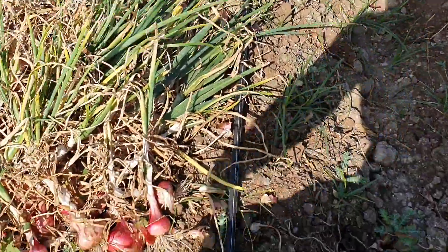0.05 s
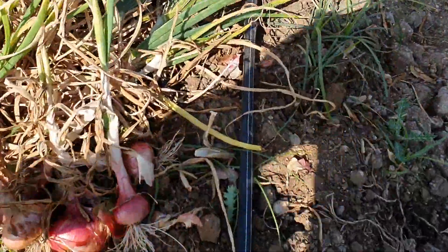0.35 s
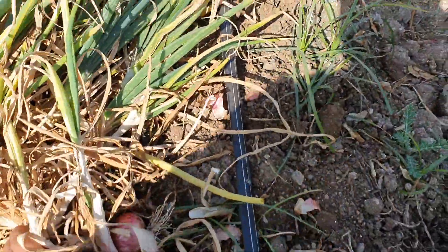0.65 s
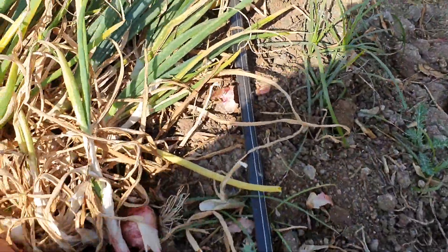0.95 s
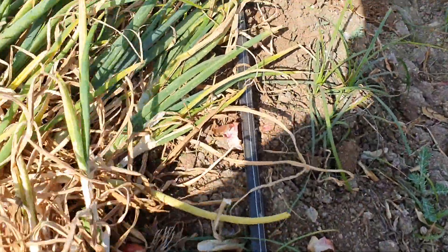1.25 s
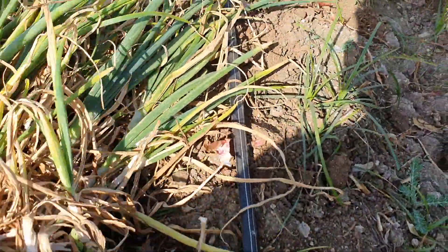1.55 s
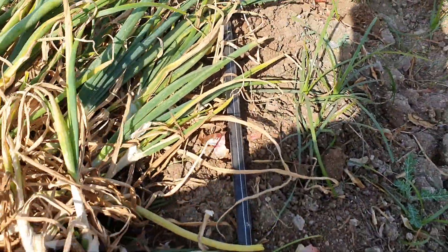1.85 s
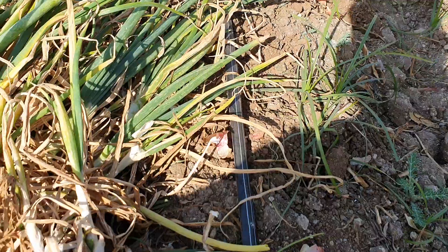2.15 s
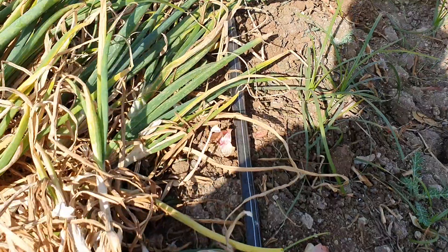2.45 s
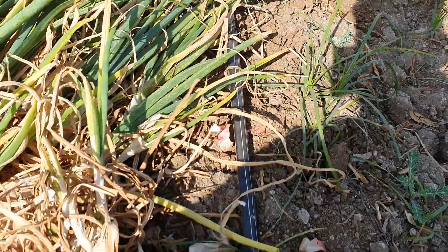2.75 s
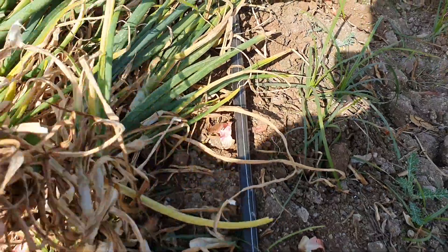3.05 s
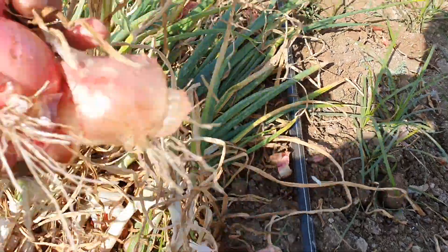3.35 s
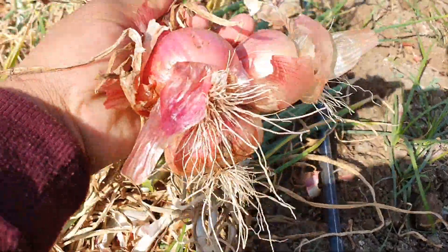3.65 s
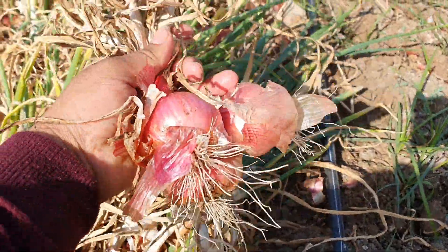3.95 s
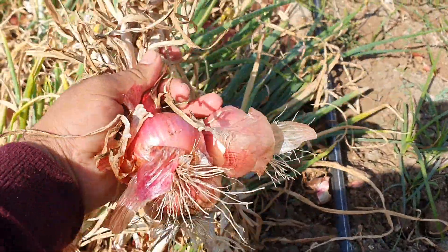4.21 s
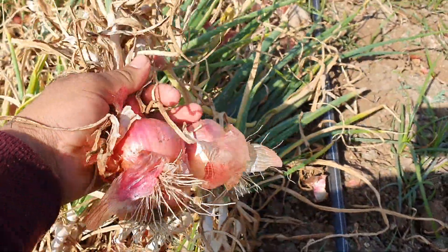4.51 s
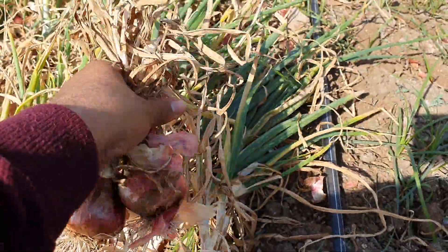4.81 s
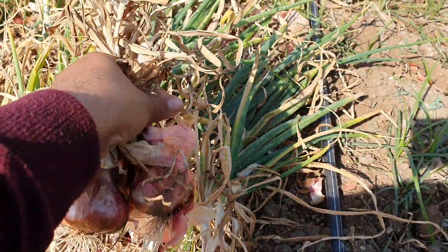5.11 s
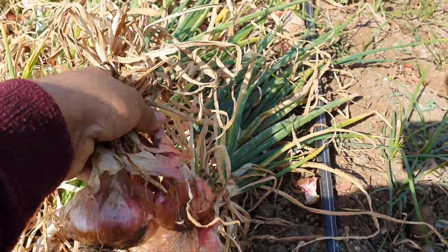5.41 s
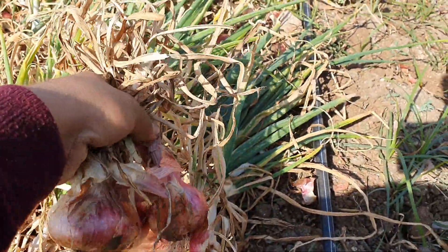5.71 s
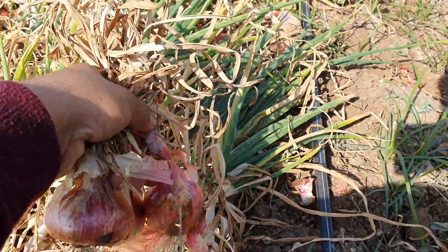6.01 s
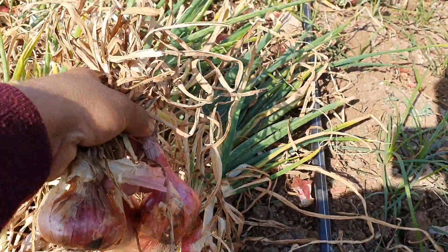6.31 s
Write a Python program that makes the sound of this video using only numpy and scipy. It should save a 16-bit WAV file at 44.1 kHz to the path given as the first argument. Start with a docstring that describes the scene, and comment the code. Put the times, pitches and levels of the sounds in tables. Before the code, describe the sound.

Dry onion tops crackle and snap as onions are pulled from the soil with soft thuds and handled, over a low rumble.

```python
"""Onions are pulled by hand in a dry field, over a low rumble and a faint stir of leaves.
A clod crumbles; then, close on the left, the withered tops crackle and snap as their fibres fracture,
and green stalks rasp by friction. Near 3 s roots tear out of the soil with damped thuds.
From 3.5 s dry leaves rustle off to the right while the bunch is lifted and turned.
A small, distant bird calls once near 5.7 s, and the leaves on the right end with a hard scrape."""
import sys
import numpy as np
from scipy import signal
from scipy.fft import rfft, irfft, next_fast_len
from scipy.io import wavfile
from scipy.ndimage import map_coordinates

SR = 44100
rng = np.random.default_rng(int(sys.argv[2]) if len(sys.argv) > 2 else 0)


def unload_audio(sound):
    """Save the sound as a 16-bit wav file, at the path given as the first command line argument."""
    columns = np.transpose(np.atleast_2d(sound))
    # keep every value between -1 and 1, then stretch to whole-number steps
    steps = np.round(np.clip(columns, -1, 1) * 32767)
    wavfile.write(sys.argv[1], SR, steps.astype(np.int16))


N = 280917
TIME = np.arange(N) / SR


def amp(db):
    """Amplitude ratio of a level in decibels."""
    return 10 ** (np.asarray(db) / 20)


def unit(x):
    """Normalisation to unit rms."""
    return x / np.sqrt(np.mean(x ** 2) + 1e-20)


def balance(db):
    """Level difference between channels: the left gains db, the right loses as much."""
    return amp(db * np.array([[1], [-1]]))


def along(points, hz):
    """Interpolation of a spectrum on a logarithmic frequency axis."""
    f, level = np.transpose(points)
    return np.interp(np.log(hz + 1), np.log(f + 1), level)


def curve(points):
    """Linear interpolation of (time, value) points at every sample."""
    return np.interp(TIME, *np.transpose(points))


def wobble(rate):
    """Slow random modulation: a spline through rate Gaussian knots a second."""
    coarse = TIME[::8]
    knots = rng.standard_normal(int(N * rate / SR) + 4)
    return np.interp(TIME, coarse, map_coordinates(knots, [coarse * rate]))


def coloured(x, gain):
    """Minimum-phase filtering: folding the cepstrum gives a causal response of magnitude gain(f)."""
    m = 2 * next_fast_len(N // 2 + 4096)
    magnitude = np.maximum(gain(np.fft.rfftfreq(m, 1 / SR)), 1e-6)
    cepstrum = irfft(np.log(magnitude), m)
    cepstrum[1:m // 2] *= 2
    cepstrum[m // 2 + 1:] = 0
    return irfft(rfft(x, m) * np.exp(rfft(cepstrum)), m)[..., :N]


def scattered(x, wet_db, t60):
    """Diffuse scattering: soil and leaves add a tail to short waves, new on each side every 10 ms."""
    block = SR // 100
    t = np.arange(3 * block) / SR
    short_waves = signal.sosfilt(signal.butter(2, 650, "highpass", fs=SR, output="sos"), x)
    pieces = np.pad(short_waves, ((0, 0), (0, -N % block))).reshape(2, -1, block)
    tails = rng.standard_normal((2, pieces.shape[1], len(t)))
    tails *= amp(-60 * t / t60) * (1 - np.exp(-t / 0.00064))
    tails /= np.linalg.norm(tails, axis=-1, keepdims=True)
    echoes = signal.fftconvolve(pieces, tails, axes=2)
    at = block * np.arange(pieces.shape[1])[:, None] + np.arange(echoes.shape[2])
    return x + amp(wet_db) * np.array([np.bincount(at.ravel(), side.ravel())[:N] for side in echoes])


def fractures(lead_ms, per_second, size_db, spread_ms, clump_db):
    """Brittle fracture: fibres emit random impulses, reaching the left about lead_ms before the right."""
    polarity, strength, spot = rng.standard_normal((int(per_second * N / SR), 3)).T
    at = rng.integers(0, N, len(spot))
    clumps = wobble(45) + wobble(220)
    size = np.sign(polarity) * amp(size_db * np.minimum(strength, 2.5) + clump_db * clumps[at])
    half_lead = (lead_ms[at] + spread_ms * spot) * SR / 2000
    arrivals = np.round(4 * np.array([at - half_lead, at + half_lead]))  # in quarter samples
    fine = [np.bincount(side, size, 4 * N) for side in np.clip(arrivals, 0, 4 * N - 1).astype(int)]
    return unit(signal.resample_poly(np.array(fine), 1, 4, axis=1))


def rustle(clicks, colour_db, levels, flutter_db):
    """Source and filter: impulses excite three bands, each shaped by colour_db and set to its level."""
    bands_hz = [(1900, 7500), (7500, 20000), (150, 1900)]  # blade crackle, thin-skin fizz, stalk body
    out = np.zeros((2, N))
    for (lo, hi), db in zip(bands_hz, levels):
        def gain(hz):
            return amp(colour_db(hz)) / np.sqrt((1 + (lo / (hz + 1)) ** 12) * (1 + (hz / hi) ** 12))
        out += amp(db) * unit(coloured(clicks, gain) * amp(flutter_db * wobble(300)))
    return out


def burst(hz, width, t60):
    """Resonance driven by decaying noise, at unit peak; width is the fractional bandwidth."""
    t = np.arange(SR // 5) / SR
    kick = rng.standard_normal(len(t)) * amp(-60 * t / t60)
    b, a = signal.iirpeak(min(hz, SR / 2.5), max(1 / width, hz / 9000), SR)
    ring = signal.lfilter(b, a, kick)
    return ring / np.abs(ring).max()


def stroke(start, length, attack_s=0.093, release_db_per_s=146):
    """Envelope of one movement: a quarter-sine rise, and exponential decay once its length is over."""
    t = TIME - start
    rise = np.sin(np.pi / 2 * np.clip(t / attack_s, 0, 1))
    return rise * amp(-release_db_per_s * np.clip(t - length, 0, 1))


def effort(strokes):
    """Incoherent addition: the powers of strokes sum to crackle, fizz and body levels in dB."""
    power = np.full((3, N), 1e-12)
    for start, length, db, fizz_db, body_db in strokes:
        power += (amp([[db], [db + fizz_db], [db + body_db]]) * stroke(start, length)) ** 2
    return 10 * np.log10(power)


# Spectrum of the rumble: f/Hz, relative density/dB
RUMBLE_SPECTRUM = [(12, -27), (20, -18), (40, -2), (60, 5), (98, -1), (139, -9.5), (387, -24), (500, -39),
                   (650, -45), (1100, -120)]
# Envelope of the rumble: t/s, level/dB
RUMBLE_ENVELOPE = [(0, -54), (.09, -62), (.24, -48.5), (.39, -62.5), (.5, -55), (2.5, -53.5), (5.2, -55),
                   (6.37, -55.5)]
# Soft bumps in the rumble: t/s, envelope peak/dB
BUMPS = [(.21, -39.5), (.475, -45), (.94, -45), (1.23, -43), (1.605, -44), (1.91, -48), (2.811, -40),
         (4.131, -45), (4.32, -45), (4.48, -45), (4.63, -46), (4.861, -43), (5.77, -46.5), (5.92, -45),
         (6.26, -45.5)]
def rumble(bump_s=0.014, bump_hz=68):
    """Low-frequency noise, nearly coherent between the sides, with Gaussian tone pulses as bumps."""
    mid, side = coloured(rng.standard_normal((2, N)), lambda hz: amp(along(RUMBLE_SPECTRUM, hz)))
    side = side * amp(-10.0)
    noise = unit(np.array([mid + side, mid - side]) * amp(1.7 * wobble(16)))
    out = amp(curve(RUMBLE_ENVELOPE)) * noise
    for (s, db), (turn, detune) in zip(BUMPS, rng.uniform(-1, 1, (len(BUMPS), 2))):
        t = TIME - s
        phase = 2 * np.pi * bump_hz * (1 + 0.14 * detune) * t + np.pi * turn
        out += amp(db) * np.exp(-(t / bump_s) ** 2) * np.cos(phase)
    return out


# Spectrum of the leaves all around: f/Hz, relative density/dB
FIELD_SPECTRUM = [(150, -22), (330, -18), (560, -22), (950, -17.5), (1400, -13), (1900, -11), (2350, -3),
                  (3100, -6.5), (4000, -1), (4600, -5), (5700, -8), (7600, -17), (12500, -13), (15800, -20)]
# Their steady band levels: crackle/dB, fizz/dB, body/dB
FIELD_LEVELS = (-56.5, -56, -64.5)
def field_leaves():
    """Superposition: countless small fractures all around merge into a continuous rustle."""
    clicks = fractures(np.full(N, -0.063), per_second=5000, size_db=4.0, spread_ms=0.096, clump_db=1.0)
    clicks = scattered(clicks, wet_db=0.0, t60=0.03)
    sound = rustle(clicks, lambda hz: along(FIELD_SPECTRUM, hz), FIELD_LEVELS, flutter_db=0.5)
    return sound * amp(0.91 * wobble(25)) * balance(0.35)


# The two notes of the call: t/s, duration/s, first f/Hz, last f/Hz, level/dB
BIRD_NOTES = [(5.654, 0.065, 3720, 5120, -53.5), (5.755, .026, 5200, 4450, -54)]
def bird():
    """Frequency modulation of a pure tone: a thin whistle glides up, breaks and drops."""
    out = np.zeros(N)
    for start, length, first_hz, last_hz, db in BIRD_NOTES:
        u = np.clip((TIME - start) / length, 0, 1)
        hz = first_hz * (last_hz / first_hz) ** u * (1 + 0.0087 * wobble(300))
        out += amp(db) * np.sqrt(4 * u * (1 - u)) * np.sin(2 * np.pi * np.cumsum(hz) / SR)
    return out


ASIDE_LEAD_MS = -0.428  # negative: the sound reaches the right first
# Spectrum of the leaves on the right: f/Hz, relative density/dB
ASIDE_SPECTRUM = [(150, -7), (300, -18.5), (565, -15), (950, -7.5), (1600, -11.5), (2300, -2.5), (2800, -5),
                  (3700, 1), (6000, -2), (7600, -20), (12500, -5.5), (15800, -15.5)]
# Peaks and dips of hollow stalks: f/Hz, bandwidth/Hz, gain/dB
STALK_BANDS = [(1790, 230, -5), (2317, 230, 8), (2712, 190, -1), (3170, 460, 12.5), (4670, 300, -9)]
# Movements of these leaves: t/s, duration/s, crackle level/dB, fizz and body/dB re crackle
ASIDE_STROKES = [(3.484, 0.081, -48, -2.5, -9.5), (3.635, 0.16, -52.5, -2, -3.5),
                 (3.974, 0.26, -53.0, -4, -9.5), (4.131, 0.22, -51.5, -9, -9.5),
                 (4.356, 0.32, -56, -9, -12.0), (4.651, 0.141, -52.5, 1, -13), (4.886, 0.4, -56.5, -10, -9),
                 (5.533, 0.19, -57, 3, -3), (5.821, 0.055, -50, -1.5, -15.5), (5.962, 0.14, -48, -0.5, -16),
                 (6.174, 0.24, -37.0, -3, -10.5)]
def leaves_aside(hard_db=-47.5, transition_db=3):
    """Resonant colouring: leaves rustle on the right, and hard scrapes excite their hollow stalks."""
    def plain(hz):
        return along(ASIDE_SPECTRUM, hz)

    def hollow(hz):
        return plain(hz) + sum(db / (1 + (2 * (hz - f) / width) ** 2) for f, width, db in STALK_BANDS)

    levels = effort(ASIDE_STROKES)
    hard = (1 + np.tanh((levels[0] - hard_db) / transition_db)) / 2
    lead_ms = np.full(N, ASIDE_LEAD_MS)
    out = np.zeros((2, N))
    for colour, power_share in [(plain, 1 - hard), (hollow, hard)]:
        clicks = fractures(lead_ms, per_second=5000, size_db=5.5, spread_ms=0.027, clump_db=0.7)
        clicks = scattered(clicks, wet_db=-4.0, t60=0.028)
        out += np.sqrt(power_share) * rustle(clicks, colour, levels, flutter_db=-0.6)
    return out * balance(0.49)


# Spectrum of crumbling soil: f/Hz, relative density/dB
SOIL_SPECTRUM = [(120, -41), (200, -15), (397, 0), (789, -12), (1040, -5.5), (2420, -4), (3010, -0.5),
                 (4310, -6), (5760, -27), (10300, -23), (15000, -27)]
def clod(t60=0.15):
    """Granular fracture: a dry clod crumbles at the outset in an exponentially decaying crunch."""
    clicks = fractures(np.zeros(N), per_second=4000, size_db=3, spread_ms=0.027, clump_db=-0.8)
    clicks = scattered(clicks, wet_db=-5.5, t60=0.0092)
    crunch = unit(coloured(clicks, lambda hz: amp(along(SOIL_SPECTRUM, hz))))
    return crunch * amp(-32.5 - 60 * TIME / t60)


# Roots giving way, bulbs and clods knocking: t/s, peak before the low-pass/dB, f/Hz
SOIL_IMPACTS = [(0.115, -48.5, 440), (2.173, -45, 218), (2.767, -33.5, 190), (2.8, -33.5, 181),
                (2.824, -36.5, 300), (2.888, -45, 334), (3.354, -33.5, 1010), (3.617, -44.5, 1020),
                (5.621, -41, 286), (5.625, -52, 910), (6.21, -44, 199), (6.27, -44, 374), (6.318, -41, 333)]
def knocks():
    """Soft impact: parting roots and bumping bulbs thud, with little energy above their resonance."""
    out = np.zeros(N + SR)
    for s, db, hz in SOIL_IMPACTS:
        lowpass = signal.butter(2, 1.5 * hz, fs=SR, output="sos")
        thud = signal.sosfilt(lowpass, burst(hz, width=0.55, t60=0.075))
        out[round(s * SR):][:len(thud)] += amp(db) * thud
    return out[:N]


# Green stalks slipping on each other: t/s, duration/s, f/Hz, level/dB
STALK_SLIPS = [(1.387, 0.092, 3550, -46), (1.81, 0.026, 4080, -44.5), (1.91, .15, 3920, -58),
               (2.67, 0.18, 4110, -73), (2.948, .09, 4210, -49), (4.14, .09, 4350, -60),
               (4.7, .08, 4050, -47.5), (5.1, .15, 4400, -62), (5.3, .08, 3830, -55)]
def stalk_friction():
    """Friction: uneven slipping modulates a wandering tone into a narrow-band rasp."""
    warped_time = np.cumsum(1 + 0.015 * wobble(14)) / SR
    tone = sum(amp(db) * stroke(start, length) * np.exp(2j * np.pi * hz * warped_time)
               for start, length, hz, db in STALK_SLIPS)
    grain = np.array([wobble(450) + 1j * wobble(450) for side in "LR"])
    return np.real(tone * grain) * unit(amp(5.9 * wobble(60)))


# Single dry leaves and skins breaking: t/s, ring level/dB, f/Hz, crack/dB re ring
LEAF_BREAKS = [(0.776, -26.5, 5440, -3), (0.785, -24, 12100, -3), (1.271, -25.5, 3500, 0),
               (1.3653, -25, 4440, 0), (1.605, -30, 9400, 7), (2.145, -32.5, 6610, 3),
               (2.4753, -37, 3910, 2), (3.1794, -24, 3660, -9), (3.2326, -12, 12900, -8),
               (3.245, -20, 3100, -9), (3.5124, -36.5, 2960, 3), (3.6242, -41, 4650, 6),
               (4.1833, -30, 4890, -6), (4.3054, -23, 2780, -10.5), (4.309, -30, 2480, -3),
               (4.3242, -26, 2840, -11), (4.69, -28.5, 12200, -1.5), (5.015, -33, 4730, -7),
               (5.287, -28, 12200, -8), (5.314, -31, 12000, -12), (5.346, -30, 12100, -8),
               (5.6937, -28.5, 12000, -4), (5.76, -35, 10100, 2), (6.004, -28.5, 4160, -1),
               (6.066, -35, 4960, 1), (6.2487, -36, 2310, -14), (6.298, -29, 3030, -7)]
def snaps(lead_ms, ring_t60=0.0042):
    """Impulse excitation: a leaf cracks and rings briefly, heard first on the nearer side."""
    out = np.zeros((2, N + SR))
    t = np.arange(SR // 5) / SR
    for s, db, hz, crack_db in LEAF_BREAKS:
        ring = np.sin(2 * np.pi * hz * t) * amp(-60 * t / ring_t60) * (1 - np.exp(-t / 0.0002))
        snap = amp(db) * (ring + amp(crack_db) * burst(hz, width=0.65, t60=0.007))
        left = round(s * SR)
        right = left + round(lead_ms[left] * SR / 1000)
        out[0, left:][:len(t)] += snap
        out[1, right:][:len(t)] += snap
    return scattered(out[:, :N], wet_db=-1.0, t60=0.036)


# Spectrum of the withered tops: f/Hz, relative density/dB
TOPS_SPECTRUM = [(150, -14.5), (320, -7.5), (560, -13.5), (950, -5.5), (1450, -6), (2000, -4.5),
                 (2600, -1.5), (3050, 3), (4400, 0.5), (5100, -1.5), (6500, 0), (7500, -9), (12000, 0.5),
                 (15800, -9)]
# Direction of the gripping hand: t/s, lead of the left channel/ms
GRIP_LEAD = [(0.45, 0.27), (.72, 0.19), (1.0, 0.24), (1.22, 0.2), (2.1, 0.29), (2.3, 0.22), (2.6, 0.2),
             (3.25, 0.24), (4.6, 0.19)]
# The hand drags and turns the tops: t/s, duration/s, crackle level/dB, fizz and body/dB re crackle
HAND_STROKES = [(0.068, 0.14, -56, -5, -2.5), (0.433, 0.13, -41.5, -2.5, -12),
                (0.611, 0.092, -43, -1.5, -9), (0.727, 0.049, -37, -1.5, -11),
                (0.809, 0.071, -38.5, -1.5, -9), (0.896, 0.091, -46, -2.5, -6),
                (1.015, 0.075, -45, -3.5, -12), (1.124, 0.155, -40.5, -1.0, -8),
                (1.28, 0.11, -42.5, 1, -9.5), (1.377, 0.085, -39.0, 2, -11), (1.502, 0.2, -47, 1, -7.5),
                (1.761, 0.36, -53, 2.5, -11.5), (2.103, 0.136, -45.5, 0.5, -16.5),
                (2.216, 0.14, -43, 0, -8.5), (2.424, 0.19, -54, -2.0, -4),
                (2.517, 0.21, -44.5, -1.5, -11.0), (2.648, 0.17, -44, -1.5, -9),
                (2.732, 0.18, -38.5, -1, -9.5), (2.919, 0.14, -38, 1.5, -11.0),
                (3.068, 0.12, -35.0, 0, -11), (3.189, 0.085, -31.5, 2, -11.5),
                (3.292, 0.096, -36.5, 1, -8.5), (3.408, 0.082, -48.5, -5, -14),
                (4.594, 0.3, -49, -2.5, -12.5), (4.889, 0.56, -58.5, -1.5, -10.5),
                (5.348, 0.095, -42.5, -2.0, -12.5)]
def onion_tops():
    """Acoustic emission: fibres of the withered tops break under the hand's pull, close on the left."""
    clicks = fractures(curve(GRIP_LEAD), per_second=5000, size_db=2.5, spread_ms=0.019, clump_db=0.59)
    clicks = scattered(clicks, wet_db=-1.5, t60=0.023)
    sound = rustle(clicks, lambda hz: along(TOPS_SPECTRUM, hz), effort(HAND_STROKES), flutter_db=0.93)
    return sound * balance(0.88)


def scene():
    """Linear superposition of all sources in stereo; leaves snap on the side that crackles harder."""
    aside_louder = effort(ASIDE_STROKES)[0] > effort(HAND_STROKES)[0]
    snap_lead_ms = np.where(aside_louder, ASIDE_LEAD_MS, curve(GRIP_LEAD))
    foliage = onion_tops() + stalk_friction() + leaves_aside() + field_leaves() + snaps(snap_lead_ms)
    return foliage + knocks() + clod() + rumble() + bird()


def record(dry, cutoff_hz=15900):
    """Band limiting: an ideal low-pass removes everything above the cutoff."""
    m = next_fast_len(N + SR // 4)
    passband = np.fft.rfftfreq(m, 1 / SR) < cutoff_hz
    return irfft(rfft(dry, m) * passband, m)[:, :N]


dry = scene()
out = record(dry)
unload_audio(out)
```